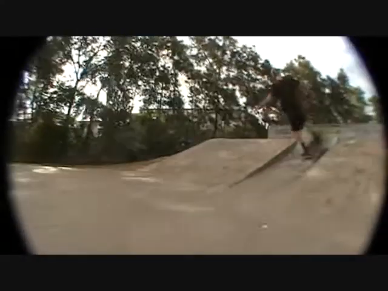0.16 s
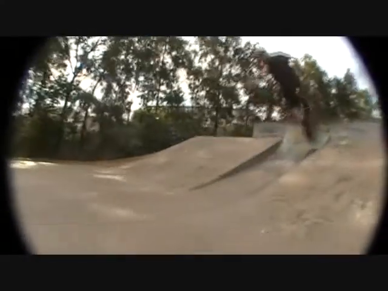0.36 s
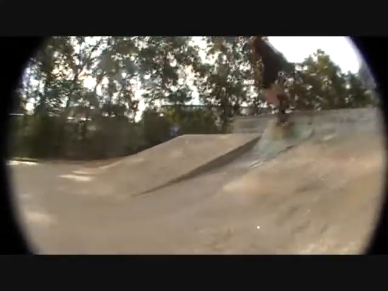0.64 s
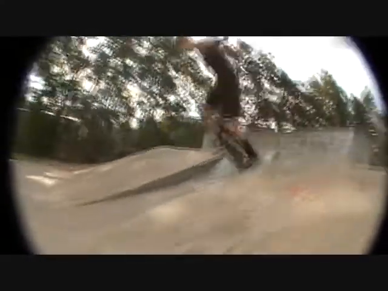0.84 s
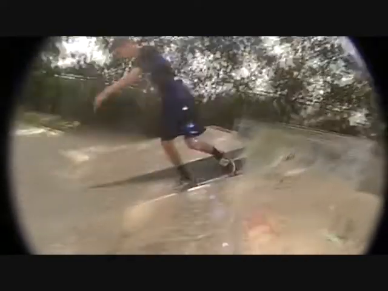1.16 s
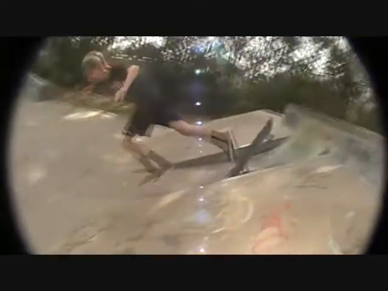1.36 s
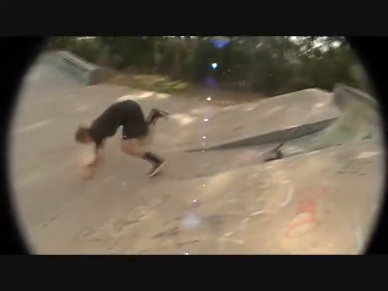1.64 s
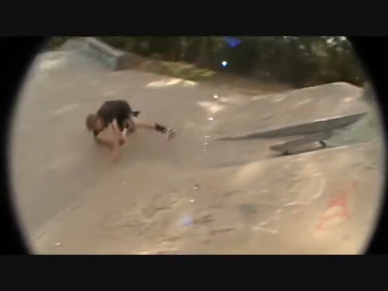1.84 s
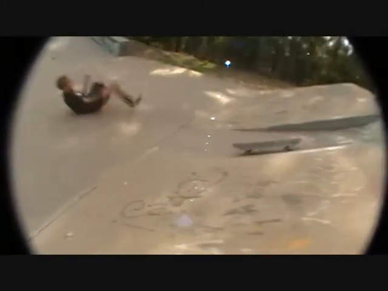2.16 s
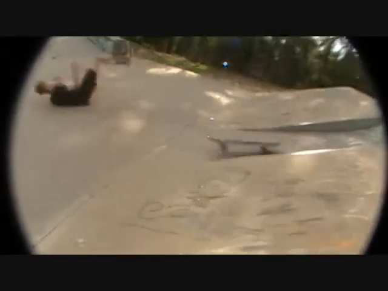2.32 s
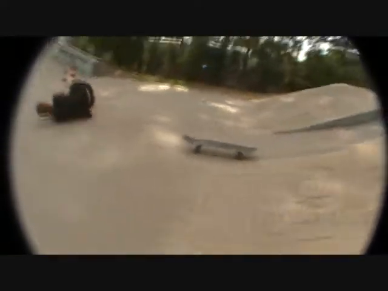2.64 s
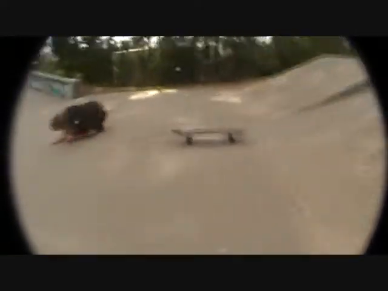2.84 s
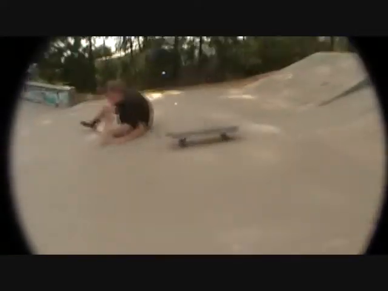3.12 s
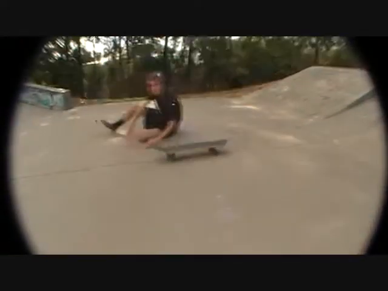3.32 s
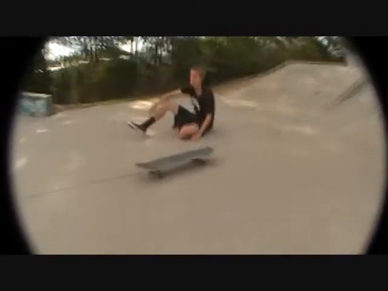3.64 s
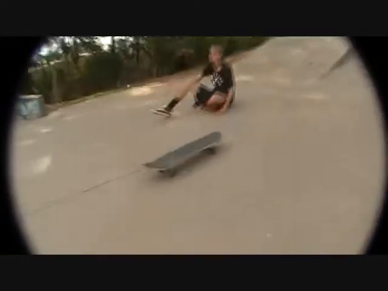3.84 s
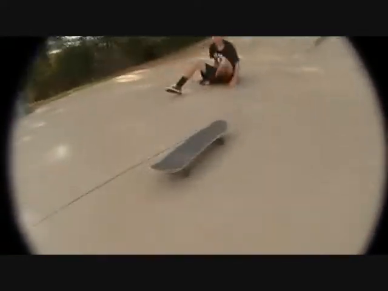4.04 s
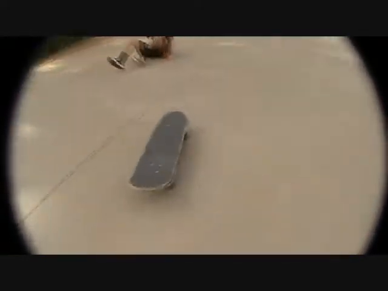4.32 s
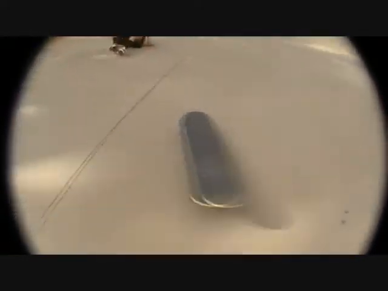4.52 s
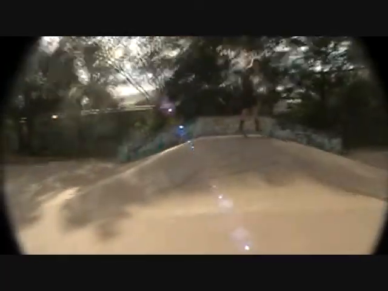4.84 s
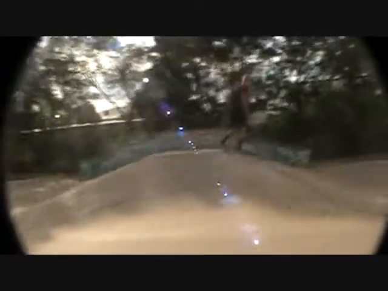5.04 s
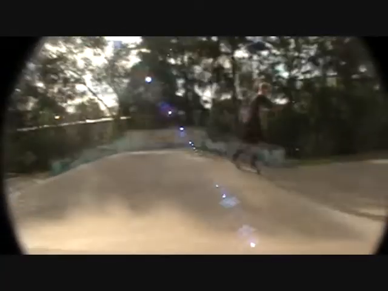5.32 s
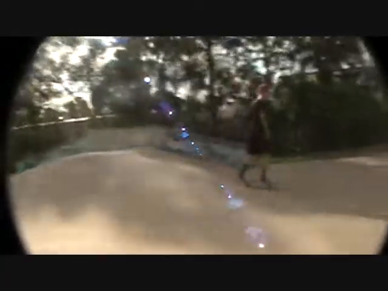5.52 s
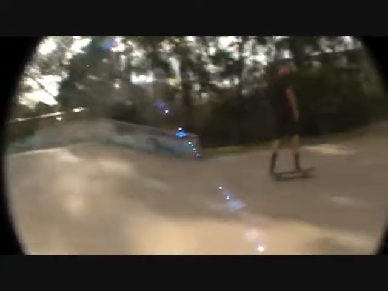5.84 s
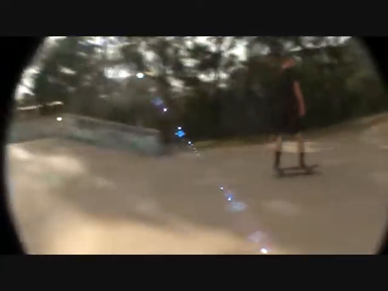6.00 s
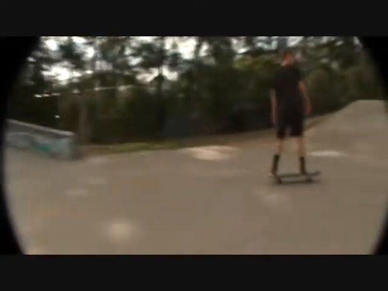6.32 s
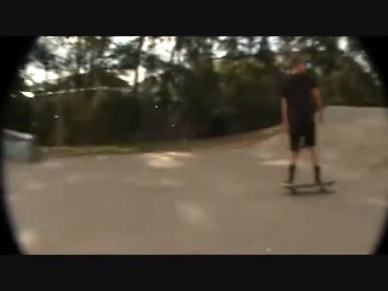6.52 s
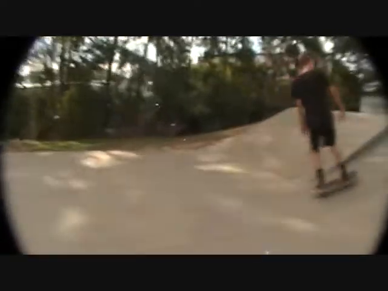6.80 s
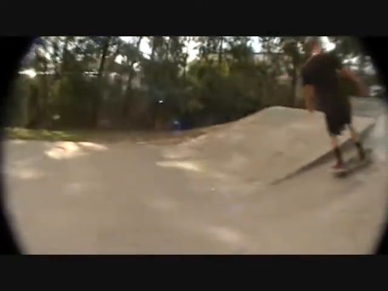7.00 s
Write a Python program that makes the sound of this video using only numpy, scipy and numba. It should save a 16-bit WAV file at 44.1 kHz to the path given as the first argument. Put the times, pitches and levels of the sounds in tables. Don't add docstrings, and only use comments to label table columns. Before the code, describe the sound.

Skateboard wheels roar over rough concrete, clack and tumble in a bail, roll close past the microphone, then silence and another board rolls by.

```python
import sys
import numpy as np
from scipy import signal
from scipy.fft import rfft, irfft
from scipy.io import wavfile
from scipy.ndimage import uniform_filter1d
from numba import njit

SR = 44100
rng = np.random.default_rng(int(sys.argv[2]) if len(sys.argv) > 2 else 0)


def gain_from_decibels(decibels):
    exponent = np.asarray(decibels, float) / 20
    return 10 ** exponent


def output_pcm(signal):
    pcm = np.clip(np.atleast_2d(signal).T, -1, 1) * 32767
    wavfile.write(sys.argv[1], SR, np.round(pcm).astype(np.int16))


N = 315756


def rms_one(x):
    return x / np.sqrt(np.mean(x ** 2) + 1e-20)


def band(x, low_hz, high_hz):
    sos = signal.butter(2, [low_hz, min(high_hz, .45 * SR)], "band", fs=SR, output="sos")
    return signal.sosfilt(sos, x)


def ring(t, hz, t60):
    return np.sin(2 * np.pi * hz * t) * gain_from_decibels(-60 * t / t60)


def lifted(x, resonances):
    for hz, width_hz, db in resonances:
        b, a = signal.iirpeak(hz, hz / width_hz, SR)
        x = x + (gain_from_decibels(db) - 1) * signal.lfilter(b, a, x)
    return x


@njit
def resonance(x, hz, width_hz, sr):
    y, r = np.zeros(len(x)), np.exp(-np.pi * width_hz / sr)
    for i in range(2, len(x)):
        push = (1 - r * r) / 2 * (x[i] - x[i - 2])
        y[i] = push + 2 * r * np.cos(2 * np.pi * hz[i] / sr) * y[i - 1] - r * r * y[i - 2]
    return y


def drift(rate_hz):
    r = np.exp(-2 * np.pi * rate_hz / SR)
    slow = signal.lfilter([1], [1, -2 * r, r * r], rng.standard_normal(N + SR))
    return rms_one(slow[SR:])


def in_time(tables):
    s, *columns = np.vstack(tables).T
    return [np.interp(np.arange(N) / SR, s, c) for c in columns]


def at_hz(points, column=1):
    hz = np.maximum(np.fft.rfftfreq(N, 1 / SR), 1)
    points = np.array(points)
    return np.interp(np.log(hz), np.log(points[:, 0]), points[:, column])


# time in seconds, peak level in dB, fall either side in dB per second.
GUSTS = [(0, -37, 80), (.33, -42.5, 38), (.55, -33.5, 150), (.7, -38.5, 33), (1.52, -57, 250),
         (1.72, -44, 248), (1.82, -41.5, 196), (2.14, -59, 80), (2.5, -42, 12), (3.45, -38, 19.5),
         (3.72, -38.5, 29), (4.63, -46.5, 60), (5.56, -36, 14), (5.98, -32, 74), (6.181, -44, 60),
         (6.634, -41, 199), (6.8, -65, 42), (7.16, -52, 202)]


def wind():
    t = np.arange(N) / SR
    lull_db = -66
    gusts = [np.maximum(db - fall * abs(t - s), lull_db) for s, db, fall in GUSTS]
    gust_db = np.max(gusts, axis=0)
    eddies = rng.standard_normal((2, N)) * gain_from_decibels(3.5 * drift(28))
    shared, opposed = (rms_one(band(band(e, 120, 400), 34, 410)) for e in eddies)
    opposed = gain_from_decibels(gust_db + 13) * opposed
    rumble = rms_one(band(eddies[0], 20, 70))
    return gain_from_decibels(gust_db + 1.5) * (shared + gain_from_decibels(-23) * rumble) + 0.11 * opposed, opposed


STAGE_STARTS = [0, .6, 1.12, 1.55, 2.03, 2.78, 3.22, 3.8, 4.2, 4.46, 5, 6.1, 6.55]
# deck in Hz, wheel in Hz, axle in Hz, deck overtone in dB,
# axle ring in dB.
STAGE_TUNING = [(437, 1340, 2670, -1.5, 7.5), (489, 1050, 2300, -6.5, 1), (545, 1140, 2540, -15.5, 5),
                (700, 860, 2540, -27, 3), (564, 1210, 2540, -35, 1), (570, 1190, 3700, -18, -3),
                (598, 1450, 2700, -18, 3.5), (600, 1400, 2400, -16, 2), (590, 1370, 2320, -8.5, 7),
                (540, 1330, 2330, -2.5, 5), (525, 1220, 2510, -23, 8.5), (543, 1120, 2510, -21, 8.5),
                (544, 1190, 2500, -25.5, 5.5)]
# trucks in dB, bearings in dB, spread to the sides in dB,
# lumpiness in dB, left over right in dB.
STAGE_FACING = [(-9.5, -19, -7, 0.96, 1), (-11.5, -20, -4, 2, 0), (-15, -21, -31.5, 1, -.5),
                (-7, -14, -19, 2, 1), (-10.5, -17, -23, 2.1, -1), (-13.5, -19.5, -17.5, 0, -1),
                (-13, -19, -25, 0.87, -0.5), (-11.5, -18.5, -19, 0.74, -0.5), (-14, -21, -23, 1, .5),
                (-12, -21.5, -18, 1, -0.5), (-11.5, -17.5, 0, -0.5, 0), (-12.5, -19, -15, 0.65, -1),
                (-9, -15.5, -18.5, 1, 0.1)]


def stages():
    stage = np.searchsorted(STAGE_STARTS, np.arange(N) / SR, "right") - 1
    held = np.hstack([STAGE_TUNING, STAGE_FACING])[np.maximum(stage, 0)]
    blend_s = .12
    return uniform_filter1d(held, round(blend_s * SR), axis=0, mode="nearest").T


def concrete(per_s, spread_db, lumps_db):
    sizes = gain_from_decibels(spread_db * np.minimum(rng.exponential(1, N), 5)) * rng.choice([-1, 1], N)
    grains = sizes * (rng.random(N) < per_s / SR)
    return rms_one(grains + 0.28 * rng.standard_normal(N)) * gain_from_decibels(lumps_db)


# time in seconds, load on the deck in dB, wheel speed as roar over deck in dB.
FIRST_BOARD = [(0, -24, 1.5), (.3, -23, -0.5), (.51, -24, -3.5), (.66, -28, -1), (.76, -22, -4.5),
               (.92, -22.5, -3.5), (1.1, -29, -4.5), (1.39, -29, -6), (1.55, -37, -7), (1.93, -44.5, -1),
               (2.05, -29.5, -6), (2.26, -19.5, -9.5), (2.72, -20, -7), (2.83, -30.5, -1.5),
               (3.06, -27, -0.5), (3.4, -25.5, 4), (4.06, -23.5, 2), (4.5, -23, 4.5)]
SECOND_BOARD = [(5.5, -22.5, -2.5), (5.9, -20.5, -8), (6.074, -22.5, -10.5), (6.288, -25.5, -10),
                (6.434, -27.5, -3), (6.6, -20.5, -6), (6.812, -19, -7), (7.16, -21.5, -6.5)]
# centre in Hz, width in Hz, lift in dB.
TRUCK_MODES = [(3400, 1400, 7.5)]
# centre in Hz, width in Hz, lift in dB.
BEARING_MODES = [(7940, 1200, -0.5), (9500, 1000, 2.5)]
# frequency in Hz, level in dB per Hz.
SIDE_COLOUR = [(250, -20.5), (420, 1.5), (632, -2.5), (1050, -11.5), (3200, -37), (7600, -44.5),
               (9600, -31.5), (16000, -57.5)]


def rolling():
    deck_db, speed_db = in_time([FIRST_BOARD, SECOND_BOARD])
    (deck_hz, wheel_hz, axle_hz, overtone_db, ring_db,
     truck_db, bearing_db, spread_db, lumpy_db, _) = stages()
    wheel_db = deck_db + speed_db
    truck_db = truck_db + 0.83 * wheel_db
    bearing_db = bearing_db + 0.62 * wheel_db
    lumpy_db = np.clip(lumpy_db, 0, 3)

    lumps = drift(30)
    coarse, other = (concrete(5000, spread_db=1.5, lumps_db=lumpy_db * lumps) for _ in range(2))
    medium_lumps_db = 0.64 * lumpy_db * (1.9 * lumps + 0.59 * drift(40))
    medium = concrete(6000, spread_db=2.0, lumps_db=medium_lumps_db)
    small, fine = (concrete(12000, spread_db=3.5, lumps_db=.5 * lumpy_db * (lumps + 0.87 * drift(4.1)))
                   for _ in range(2))

    drone = resonance(resonance(coarse, deck_hz, 200.0, SR), deck_hz, 300.0, SR)
    overtone = lifted(band(other, 650, 900), [(770, 110, 1.2)])
    rumble_db = -10.5 + 1.5 + .25 * speed_db
    deck = drone + gain_from_decibels(overtone_db) * overtone + gain_from_decibels(rumble_db) * band(other, 247, 520)

    wheels = resonance(resonance(medium, wheel_hz, 410.0, SR), wheel_hz, 600., SR)
    wheels += gain_from_decibels(-7.5) * band(fine, 850, 2100)

    trucks = lifted(band(small, 1300, 3300), TRUCK_MODES)
    trucks += (gain_from_decibels(np.maximum(ring_db, 0)) - 1) * resonance(trucks, axle_hz, 220., SR)

    bearings = lifted(band(medium, 3400, 9320), BEARING_MODES)
    whistle_db = -4.5 + 0.7 * speed_db
    bearings += gain_from_decibels(whistle_db) * resonance(medium, np.full(N, 7950), 2200., SR)

    front = gain_from_decibels(deck_db + 2.0) * rms_one(deck)
    front += gain_from_decibels(wheel_db + 0.66) * rms_one(wheels)
    front += gain_from_decibels(truck_db + 0.28) * rms_one(trucks)
    front += gain_from_decibels(bearing_db + 0.55) * rms_one(bearings)

    around = concrete(9000, spread_db=7.5, lumps_db=.5 * lumpy_db * drift(25))
    wide = irfft(rfft(around) * gain_from_decibels(at_hz(SIDE_COLOUR)), N)
    high = band(wide, 3500, 17000)
    side = gain_from_decibels(deck_db + spread_db) * rms_one(wide - high) + gain_from_decibels(bearing_db - 11.5) * rms_one(high)
    return front, side


# time in seconds, peak level in dB, note in Hz.
DECK_KNOCKS = [(.259, -12, 740), (.5548, -8.5, 1650), (.749, -7.5, 575), (.834, -1, 703), (.942, -9, 412),
               (1.086, -9.5, 550), (1.431, -14, 1635), (1.519, -10, 473), (1.522, -16.5, 222),
               (1.5212, -8.5, 1117), (1.671, -21, 843), (1.609, -17.5, 930), (1.8345, -12, 773),
               (1.96, -24, 755), (2.017, -9, 785), (2.476, -7, 620), (2.537, -19, 590), (2.593, -16, 566),
               (2.723, -4.5, 590), (2.81, -6, 555), (4.497, -10.5, 792), (4.613, -12.5, 527),
               (6.0718, -6.5, 530), (6.078, -10, 543), (6.1695, -11.5, 576), (6.177, -6, 540),
               (6.378, -13.5, 616), (6.898, -9.5, 620), (7.040, -10, 530), (7.14, -11.5, 548)]


def knocks():
    out, t = np.zeros(N + SR), np.arange(SR // 8) / SR
    for s, db, hz in DECK_KNOCKS:
        cycles = 55. if 1.6 < s < 2.0 else 11
        t60 = np.clip(cycles / hz, .03, .06)
        below_hz, above_hz = rng.uniform([.55, 1.35], [.75, 1.7]) * hz
        note = ring(t, hz, t60)
        note += gain_from_decibels(-12.5) * ring(t, below_hz, .6 * t60) - gain_from_decibels(-7.0) * ring(t, above_hz, 0.85 * t60)
        note *= 1 - np.exp(-t / 0.0039)
        at = round(s * SR)
        out[at:at + len(t)] += gain_from_decibels(db) * note / abs(note).max()
    return out[:N]


# time in seconds, peak level in dB, wood over crack in dB, crack
# in Hz.
DAMPED_CLACKS = [(.3247, -4.5, -5, 3760), (.7512, -11.5, 5, 3500), (.836, -17, 11.5, 3240),
                 (1.0436, -4, -4, 5340), (1.069, -22.5, 8, 3770), (1.0867, -13, 4, 4930),
                 (1.43, -4, 1, 3774), (1.8624, -17, 2.5, 3340), (2.5764, -8.5, -20.5, 6440),
                 (2.5832, -7, -3.5, 5050), (2.8118, -17.5, 7.5, 3330), (5.619, -4.5, -1, 6370),
                 (5.6928, -7, -2, 4440), (.7736, -7, -11.5, 3270), (2.0095, -12, 3, 6840)]
FREE_BOUNCES = [(1.227, -19.5, -13, 3060), (1.3327, -22.5, -6.5, 4150), (1.520, -9, 4, 3050),
                (1.6078, -20, 7.5, 3000), (1.671, -28, 5, 3740), (1.7163, -18.5, 2.5, 3550),
                (1.7544, -15, -5, 8220), (1.8340, -4.5, 1.5, 5960), (1.96, -16, -6, 7400),
                (2.018, -6.5, -1, 6830), (2.0962, -12, -4.5, 6640), (2.3567, -10, -5, 3000),
                (5.814, -15, 3, 4770), (6.8043, -7, -2.5, 6190)]
GRIT_TICKS = [(.5541, 0.5, -9.5, 4940), (1.1802, -21, -13, 3030), (1.5064, -18.5, 4.5, 3030),
              (1.6844, -12, 3.5, 3233), (1.7025, -20.5, 11, 3540), (1.7913, -28.5, -16, 3430),
              (2.0712, -21, -0.5, 5110), (2.1435, -24, -11, 3060), (2.378, -3.5, -17, 5910),
              (2.4778, -14, 2, 3380), (2.5107, -16, -4.5, 3060), (2.7252, -12.5, 4.5, 3450),
              (2.8594, -27, -10.5, 3010), (2.9966, -18.5, -8, 3410), (3.1323, -5.5, -13.5, 10730),
              (4.0158, -11, 0.5, 3280), (6.0735, -23, -6, 4000), (6.178, -20, -6, 4200),
              (6.7296, -13.5, -18, 3340)]
# frequency in Hz, level in dB, 60 dB decay in seconds.
WOOD_MODES = [(786, 1.5, .06), (1190, 8, .035), (1260, -9, .03), (1627, 2, 0.061), (1790, 0.5, 0.03),
              (1880, -1, 0.051), (2282, -4, 0.038), (2500, -9, 0.037), (2960, -17, 0.027)]


def clacks():
    out, t = np.zeros(N + SR), np.arange(SR // 8) / SR
    kinds = [(DAMPED_CLACKS, 0.026), (FREE_BOUNCES, .047), (GRIT_TICKS, 0.0063)]
    for s, db, wood_db, hz, t60 in [(*row, t60) for rows, t60 in kinds for row in rows]:
        snap = gain_from_decibels(6.5 - 60 * t / 0.0046)
        chatter = gain_from_decibels(-60 * t / t60)
        scattered = gain_from_decibels(-21.5 - 60 * t / .2)
        fade = (snap + chatter + scattered) * np.minimum(t / 0.0011, 1)
        burst = rng.standard_normal(len(t)) * fade
        crack = band(burst, 0.42 * hz, 1.38 * hz) + gain_from_decibels(-3.0) * band(burst, 2000, 10000)

        uneven = rng.uniform(-1.3, 1, len(WOOD_MODES))
        wood = sum(gain_from_decibels(mode_db + 3.9 * u) * ring(t, mode_hz, min(mode_t60, 1.2 * t60))
                   for (mode_hz, mode_db, mode_t60), u in zip(WOOD_MODES, uneven))
        wood = rms_one(np.convolve(wood, burst[:SR // 150])[:len(t)])
        wood += gain_from_decibels(2.0) * rms_one(band(burst, 750, 2910))
        at = round(s * SR)
        out[at:at + len(t)] += gain_from_decibels(db) * (crack / abs(crack).max() + gain_from_decibels(wood_db) * wood / abs(wood).max())
    return out[:N]


# time in seconds, peak level in dB, length in seconds,
# low edge in Hz, high edge in Hz.
DRAGS = [(1.069, -20, 0.0069, 1200, 9000), (1.504, -22.5, 0.014, 1500, 11000),
         (1.607, -18, 0.0094, 900, 5000), (1.672, -19.5, 0.01, 700, 11000),
         (2.006, -18, 0.037, 1500, 10000), (2.802, -17.5, 0.0044, 500, 4000)]


def scuffs():
    out, t = np.zeros(N + SR), np.arange(SR // 8) / SR
    for s, db, length, low_hz, high_hz in DRAGS:
        held = np.minimum(t / .002, 1) * gain_from_decibels(-60 * np.maximum(t - length, 0) / 0.034)
        drag = band(rng.standard_normal(len(t)) * held, low_hz, high_hz)
        at = round(s * SR)
        out[at:at + len(t)] += gain_from_decibels(db) * drag / abs(drag).max()
    return out[:N]


# frequency in Hz, left lead in radians, left over right in dB.
PORT_DIFFERENCE = [(200, 0.86, -2), (403, 0.79, -2.5), (800, -0.66, -1), (1500, -0.25, 0.5),
                   (3000, -0.14, 0.5), (7000, .05, 1), (9500, 0.52, .5)]


def scene():
    shared, opposed = wind()
    front, side = rolling()
    blows = band(knocks() + clacks() + scuffs(), 199, 9750)
    echo = np.zeros(N)
    for lag_s, db in [(.0031, -17), (.0083, -28), (.019, -27.5)]:
        lag = round(lag_s * SR)
        echo[lag:] += gain_from_decibels(db) * blows[:N - lag]
    front = front + blows + shared
    side = side + band(echo, 150, 4000) + opposed

    half = gain_from_decibels(at_hz(PORT_DIFFERENCE, column=2) / 2) * np.exp(.5j * at_hz(PORT_DIFFERENCE))
    spectrum = rfft(front)
    pan = gain_from_decibels(stages()[-1] / 2)
    left = irfft(spectrum * half, N) * pan + side
    right = irfft(spectrum / half, N) / pan - side
    return np.array([left, right])


def top_cut(x):
    return signal.sosfilt(signal.butter(12, 16370, fs=SR, output="sos"), x)


# start in seconds, end in seconds.
STRETCHES = [
    (0, 4.6515),
    (5.481, 7.16),
]
# time in seconds, dip in dB.
GAIN_DIPS = [(.259, 3), (.325, 9.5), (0.552, 17), (0.75, 9), (0.835, 13), (1.086, 4), (1.519, 8),
             (1.716, 7), (1.833, 3.5), (2.357, 5.5), (2.478, 9.5), (2.597, 6), (2.724, 7.5), (2.811, 2),
             (3.132, 7.5), (4.499, 6.5), (4.614, 8), (5.64, 3), (6.081, 7.5), (6.177, 6), (6.804, 4),
             (7.038, 4.5)]


def record(dry):
    t, dip_db = np.arange(N) / SR, np.zeros(N)
    wait_s, recovery_db_s, attack_s = .006, 150.5, 0.0039
    for s, db in GAIN_DIPS:
        dip_db[round((s + wait_s) * SR)] = db
    climb = recovery_db_s * t
    deepest = np.maximum.accumulate(np.where(dip_db > 0, dip_db + climb, 0))
    dip_db = np.maximum(deepest - climb, 0)
    attack = np.exp(-1 / (attack_s * SR))
    x = dry * gain_from_decibels(-signal.lfilter([1 - attack], [1, -attack], dip_db))

    sounding = sum((t >= start) & (t < end) for start, end in STRETCHES)
    x = 1.552 * np.tanh(x / 1.628) * sounding
    x = signal.sosfilt(signal.cheby2(16, 60, 16420, fs=SR, output="sos"), x)
    return top_cut(x)


dry = scene()
out = record(dry)
output_pcm(out)
```